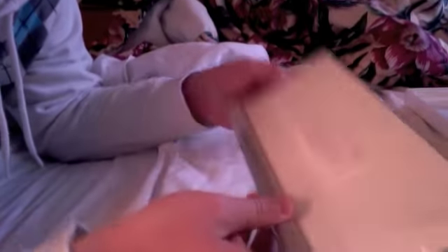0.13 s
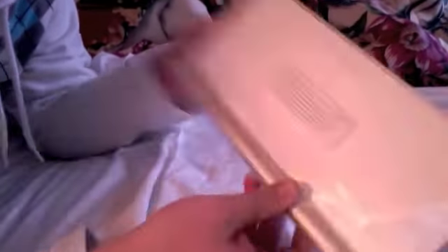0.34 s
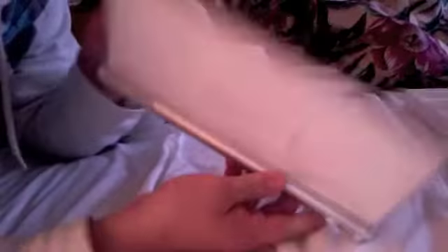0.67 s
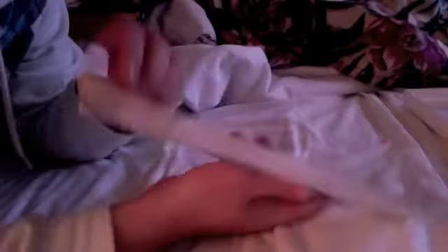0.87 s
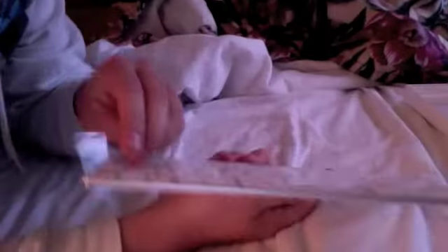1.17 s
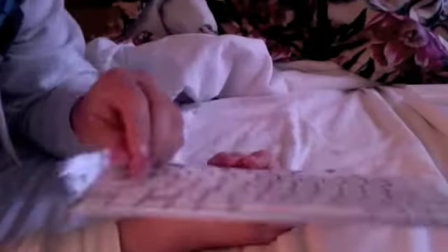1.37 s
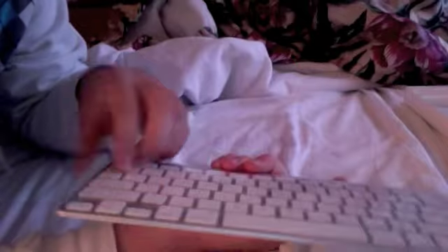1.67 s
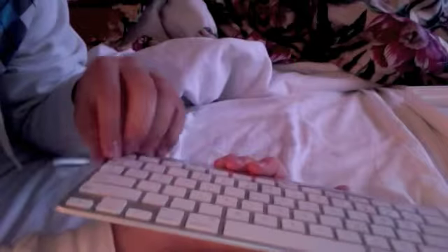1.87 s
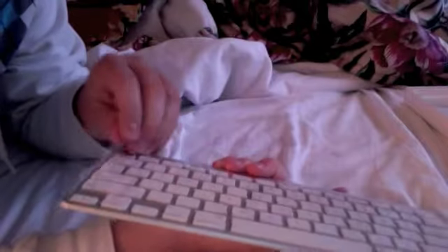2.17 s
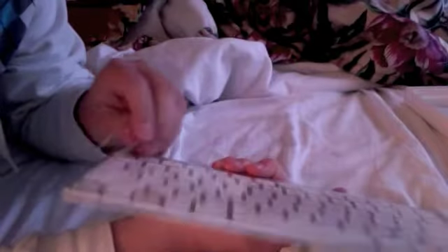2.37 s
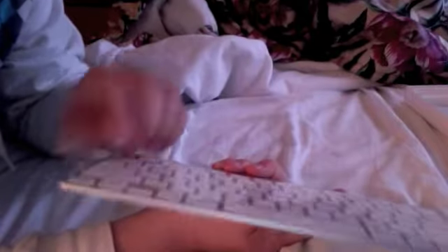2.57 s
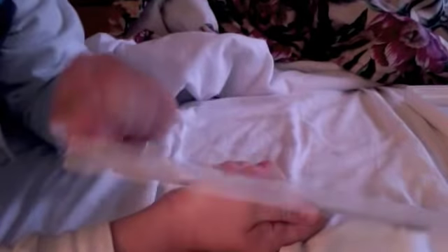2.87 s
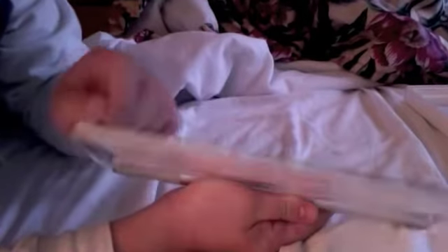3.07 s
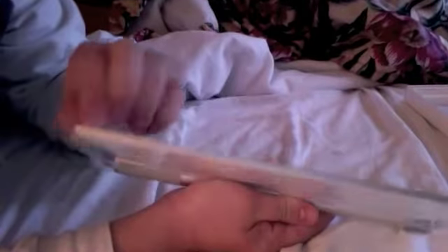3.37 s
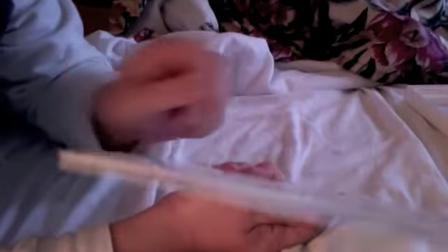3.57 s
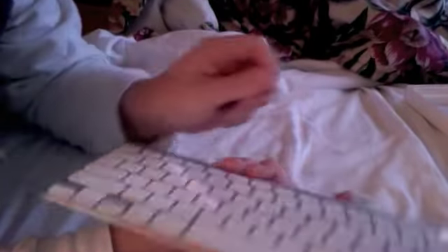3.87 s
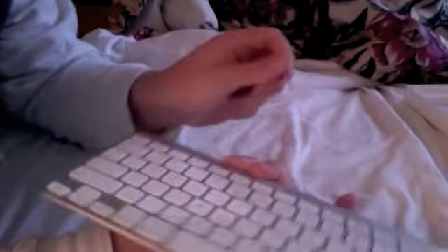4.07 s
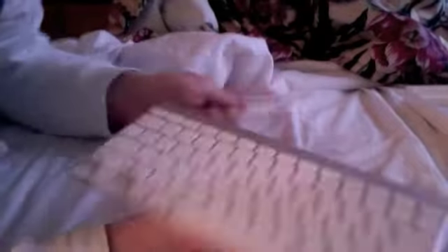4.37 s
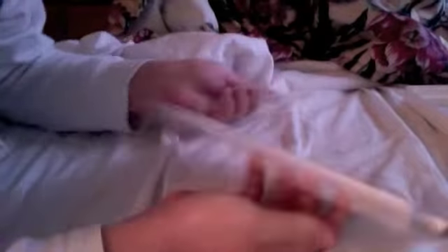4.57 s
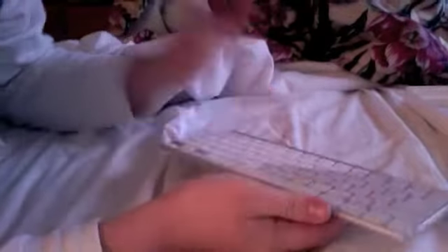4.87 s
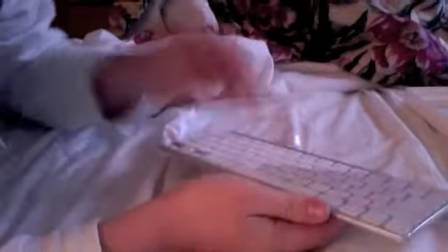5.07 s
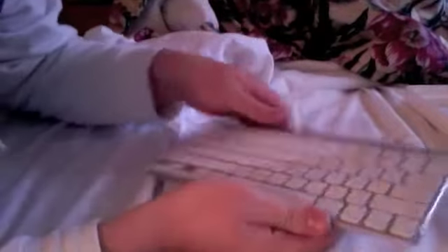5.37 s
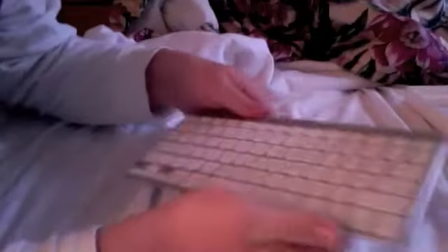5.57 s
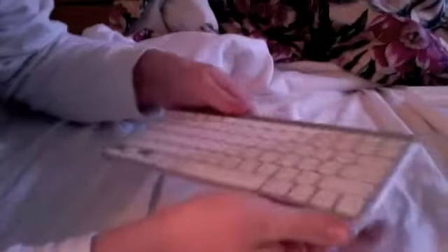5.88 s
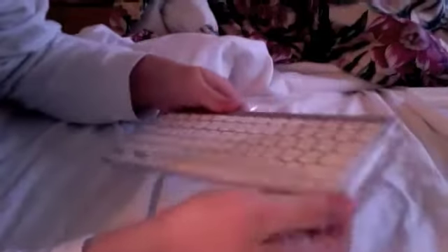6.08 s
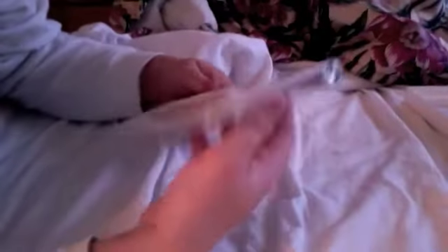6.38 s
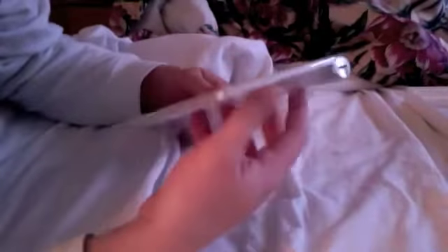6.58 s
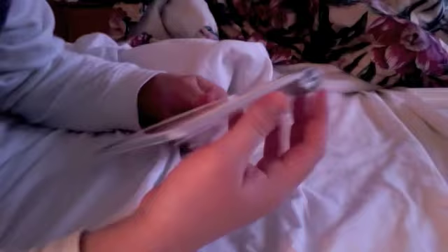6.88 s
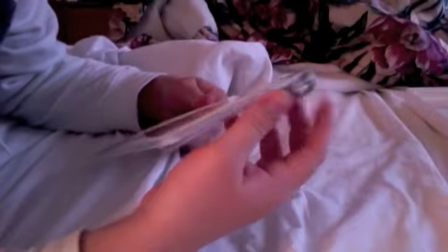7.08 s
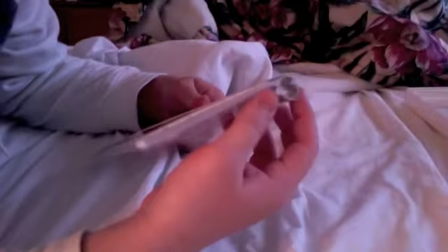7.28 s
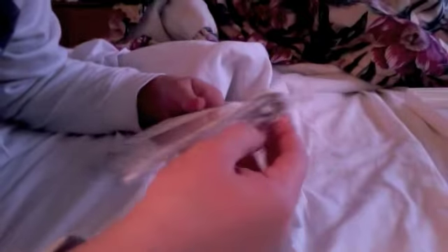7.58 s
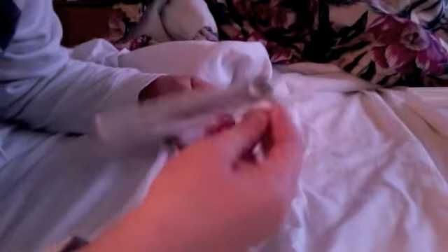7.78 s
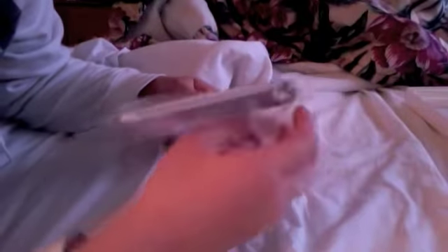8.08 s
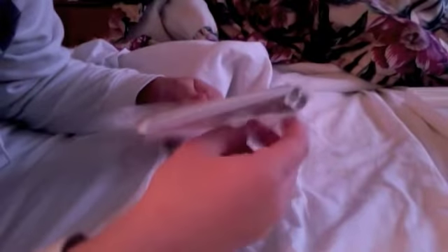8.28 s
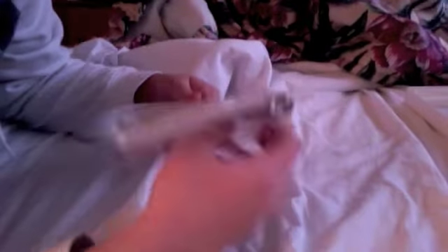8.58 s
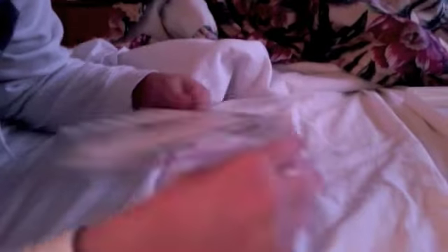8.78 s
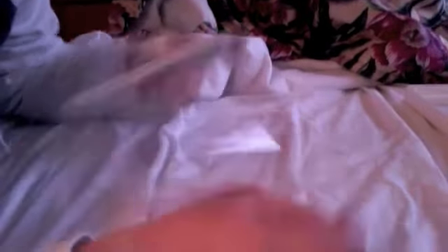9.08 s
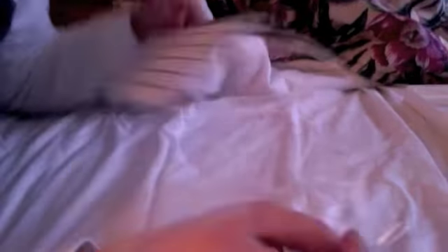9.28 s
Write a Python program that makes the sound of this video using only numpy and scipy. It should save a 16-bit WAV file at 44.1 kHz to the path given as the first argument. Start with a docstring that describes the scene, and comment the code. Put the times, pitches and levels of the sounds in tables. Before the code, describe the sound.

Thin plastic film crackles and crinkles in dry irregular snaps close up, then hard tugs and quick rips pull it off a keyboard.

```python
"""Hands peel a thin plastic sleeve off a flat keyboard, close to the microphone in a small bedroom.
Buckling creases snap as damped bands of noise; tiny facets ring at random as a fine crinkle over a rustle.
Near the end three hard tugs and three fast rips release the film in runs of slips; taut patches ping.
The keyboard knocks as damped modes, the sleeve scrapes in grainy drags, and fingertips brush a high hiss.
A short diffuse tail with two distinct reflections forms the room, over quiet air noise and a faint hum."""
import sys
import numpy as np
from scipy import signal
from scipy.fft import rfft, irfft
from scipy.io import wavfile
from scipy.ndimage import uniform_filter1d, minimum_filter1d

SR = 44100
rng = np.random.default_rng(int(sys.argv[2]) if len(sys.argv) > 2 else 0)


def pcm_store(signal):
    """Save signal as 16-bit PCM."""
    levels = np.round(np.clip(np.atleast_2d(signal), -1, 1) * 32767)
    wavfile.write(sys.argv[1], SR, levels.astype(np.int16).T)


N = 416304
TIME = np.arange(N) / SR  # [s]

# creases that snap distinctly, loud ones and faint isolated ones:
# (time [s], level of the ring [dB], wide flexing of the sheet [dB re ring], crisp tick [dB re ring])
CREASES = [(0.0342, -22, -19, -20.5), (0.066, -19, -16, -23), (0.162, -17.5, -15.5, -23.5),
           (0.268, -28, -14, -20), (0.3064, -19.5, -31, -21), (0.3805, -14.5, -13, -17),
           (0.5038, -18, -27.5, -26), (0.5563, -13.5, -26.5, -36), (0.5678, -10, -22.5, -27),
           (0.5885, -18, -17, -23), (0.637, -20.5, -31, -27), (0.6797, -10, -22.5, -30.5),
           (0.8061, -22, -41, -62), (0.9408, -29, -14.5, -31), (0.959, -21, -23, -54),
           (1.0015, -27, -17, -49), (1.0907, -32, -36, -52), (1.1363, -31.5, -15.5, -31),
           (1.1766, -29, -24, -21), (1.2004, -32.5, -7.5, -27), (1.2288, -20, -9.5, -28),
           (1.3257, -25.5, -50, -17), (1.435, -13, -24.5, -16.5), (1.6035, -18, -28, -20),
           (1.6594, -11, -26.5, -10.5), (1.7378, -25, -26, -16), (1.8379, -27.5, -31, -4),
           (1.9649, -18.5, -15.5, -14.5), (1.9783, -15.5, -31, -15), (2.0279, -22.5, -18.5, -7.5),
           (2.1547, -23.5, -21.5, -19.5), (2.212, -19.5, -49, -17), (2.3258, -17, -27.5, -13),
           (2.3353, -10.5, -33.5, -9.5), (2.394, -24, -53, -26), (2.44, -13.5, -31, -16.5),
           (2.5212, -17.5, -24, -15.5), (2.7937, -16.5, -27, -17), (2.87, -11.5, -27, -19.5),
           (2.9076, -15, -21.5, -29), (2.9384, -20.5, -42, -18), (3.0891, -22, -15, -25),
           (3.1025, -9.5, -28.5, -19.5), (3.2837, -24.5, -29, -27), (3.4199, -8.5, -18.5, -27),
           (3.4358, -12, -26.5, -24.5), (3.6346, -17.5, -20, -26), (3.6506, -22, -21, -35),
           (3.6698, -13.5, -26.5, -11.5), (3.7294, -11.5, -26.5, -39), (3.7671, -14.5, -31, -14),
           (3.7913, -17, -27, -10), (3.871, -17.5, -23, -28), (3.8856, -19.5, -25.5, -11.5),
           (3.9998, -23, -17, -31), (4.0277, -20, -19, -34), (4.0843, -18, -27.5, -18.5),
           (4.128, -11.5, -35, -21.5), (4.1799, -6, -25.5, -16.5), (4.2791, -9.5, -15.5, -21.5),
           (4.4914, -18.5, -18.5, -25), (4.5484, -20, -22, -18), (4.6109, -18.5, -24, -21),
           (4.6943, -12.5, -22, -17.5), (4.8424, -16, -28, -25), (4.8587, -18, -18, -25),
           (4.899, -14, -22, -37), (5.0734, -35.5, -11, -13), (5.2094, -35, -32, -73),
           (5.2998, -23, -9, -27), (5.3694, -26, -17, -37), (5.4833, -28, -38, -19),
           (5.5777, -28, -26, -53), (5.8004, -16.5, -23, -13.5), (5.9913, -37.5, -20, -6.5),
           (6.0879, -16.5, -20.5, -31), (6.1503, -21.5, -38, -39), (6.2025, -23.5, -30, -22),
           (6.3089, -27.5, -37, -11.5), (6.4055, -18.5, -17, -28), (6.4944, -16.5, -23.5, -29),
           (6.5854, -18.5, -26, -33), (6.625, -25.5, -19, -31), (6.6728, -21.5, -24.5, -57),
           (6.7273, -22.5, -25, -25), (6.793, -17, -21.5, -24.5), (6.8838, -22, -36, -29),
           (7.1324, -17, -30, -35), (7.3084, -12, -42, -27), (7.3331, -11, -26, -24.5),
           (7.449, -28.5, -27, -21), (7.5203, -17, -18, -21), (7.5395, -20.5, -12.5, -21),
           (7.6124, -16.5, -16.5, -29), (7.646, -18, -12.5, -26), (7.738, -14.5, -16, -24),
           (7.7687, -11, -24, -17), (7.8217, -6.5, -35, -21.5), (7.9645, -3, -18.5, -23),
           (8.1061, -7, -34, -58), (8.1194, -8.5, -31, -38), (8.1857, -8, -29, -40), (8.2016, -8, -23, -28),
           (8.2439, -4.5, -29.5, -24), (8.265, -16, -26, -15.5), (8.4335, -12.5, -21, -27),
           (8.4768, -10.5, -20, -28), (8.5073, -5, -18.5, -51), (8.6036, -5.5, -26.5, -20),
           (8.6522, -6.5, -36, -22), (8.873, 1.5, -23, -24), (8.8934, -2, -23.5, -24),
           (9.0387, -1, -20, -30), (9.2309, -26.5, -26.5, -30), (9.3391, -16.5, -35, -25),
           (9.3807, -16, -19, -33.5)]
# spells in which the fingers work the film: (start [s], end [s], crinkle level before film colour [dB])
WORKED_SPELLS = [(0.17, 0.46, -57.5), (0.57, 0.63, -54), (1.171, 1.26, -52), (1.33, 1.42, -53.5),
                 (1.6, 1.69, -56.5), (1.969, 2.059, -45.5), (2.129, 2.349, -52.5), (2.44, 2.579, -48),
                 (2.87, 2.991, -52.5), (3.66, 3.8, -71), (4.07, 4.28, -44.5), (4.279, 4.35, -37.5),
                 (4.35, 4.41, -48), (4.472, 4.778, -48), (4.85, 4.92, -51.5), (5.3, 5.351, -47),
                 (5.361, 5.519, -60), (5.56, 5.661, -58.5), (5.669, 5.731, -45.5), (6.091, 6.19, -56.5),
                 (6.29, 6.471, -63), (6.47, 6.61, -53.5), (6.681, 6.82, -52.5), (7.62, 7.72, -47),
                 (8.054, 8.3, -42), (8.43, 8.581, -40), (8.659, 8.91, -31.5), (8.921, 9.022, -44.5),
                 (9.025, 9.071, -37), (9.071, 9.179, -41), (9.33, 9.428, -55)]
# tugs that pull the sleeve off in a run of snaps:
# (start [s], end [s], time between snaps [s], mean snap level at full tension [dB])
PULLS = [(7.845, 7.909, .0065, -2), (8.289, 8.375, .0092, 0), (8.685, 8.784, .013, -3.5)]


def undb(db):
    """Decibels express amplitude ratios on a logarithmic scale; this returns the linear gain."""
    return 10 ** (np.asarray(db) / 20)


def unit(x):
    """Root-mean-square normalisation: scale x to an rms of one."""
    return x / np.sqrt(np.mean(x ** 2))


def pack(x, seconds):
    """Energy normalisation: give a short sound the energy of rms one held for so many seconds."""
    return x * np.sqrt(seconds * SR / np.sum(x ** 2))


def add(out, s, x):
    """Superposition: mix x into out from time s on."""
    i = max(int(s * SR), 0)
    out[i:i + len(x)] += x[:max(N - i, 0)]


def band(x, lo_hz, hi_hz, order=2):
    """Causal band-pass filtering: a resonant band responds only after its excitation."""
    edges_hz = [lo_hz, min(hi_hz, SR / 2 - 1000)]
    return signal.lfilter(*signal.butter(order, edges_hz, "band", fs=SR), x)


def colour(x, points):
    """Spectral shaping: weight x by gains (frequency [Hz], gain [dB]) joined on a log-frequency axis."""
    hz, db = np.transpose(points)
    f = np.arange(len(x) // 2 + 1) * SR / len(x)
    gain_db = np.interp(np.log(f + 1), np.log(hz), db)
    return irfft(rfft(x) * undb(gain_db), len(x))


def burst(rise_s, decay_s, size=512):
    """Impulsive excitation: a jolt of noise that swells fast and dies away exponentially."""
    t = TIME[:size]
    return rng.standard_normal(size) * (1 - np.exp(-t / rise_s)) * np.exp(-t / decay_s)


def swells(rows):
    """Gaussian envelopes: a bell-shaped rise and fall for each (middle [s], length [s], level [dB])."""
    return sum(undb(db) * np.exp(-(2 * (TIME - s) / length) ** 2) for s, length, db in rows)


def facet(hz, size=256):
    """Modal superposition: a facet flips and a few scattered modes die within a millisecond or two."""
    t, ring_s = TIME[:size], .0005
    modes_hz = np.minimum(hz * np.exp(.3 * rng.standard_normal((4, 1))), .42 * SR)
    strengths = rng.standard_normal(modes_hz.shape)
    ring = np.sum(strengths * np.sin(2 * np.pi * modes_hz * t), axis=0)
    return unit(ring * np.exp(-t / ring_s) * (1 - np.exp(-4 * t / ring_s)))


def snap(level_db, flex_db, tick_db, rise_s=0.000069, decay_s=0.0014, spread=1.554, detune=0.15, facet_db=-9):
    """Snap-through buckling: a crease flips, its small facet rings, the sheet flexes and the fold ticks."""
    jolt = burst(rise_s, decay_s)
    ring_shift, flex_shift = np.exp(detune * rng.standard_normal(2))
    # a wide crease flexes more and rings lower, a tight one ticks more and rings higher
    ring_hz = 3900 * np.exp(0.014 * tick_db - 0.018 * flex_db) * ring_shift
    crack = unit(band(jolt, ring_hz / spread, ring_hz * spread, order=1))
    ring = band(crack + undb(facet_db) * facet(ring_hz, size=512), 3200, 6330)
    flex = band(band(jolt, 1300 * flex_shift, 2500 * flex_shift), 400, 2600)
    tick = band(jolt, 8980, 14850)
    flexing = undb(flex_db) * pack(flex, 0.0021)
    ticking = undb(tick_db) * pack(tick, 0.0012)
    return undb(level_db) * (pack(ring, 0.00015) + flexing + ticking)


def snaps(chance=.4, follow_s=.006, follow_db=-11):
    """Triggered release: a buckling crease may set off a neighbouring one a few milliseconds later."""
    out = np.zeros(N)
    draws = rng.random((len(CREASES), 2))
    for (s, db, flex_db, tick_db), (draw, lag) in zip(CREASES, draws):
        add(out, s, snap(db, flex_db, tick_db))
        if draw < chance:
            add(out, s + follow_s * (.5 + lag), snap(db + follow_db, flex_db, tick_db))
    return out


def volley(times, level_db, scatter_db):
    """Statistical variation: ordinary creases snap, each with a size and colour of its own."""
    mean_flex_db, mean_tick_db, colour_scatter_db = -27.5, -24, 3.5
    out = np.zeros(N)
    size, flex, tick = np.clip(rng.standard_normal((len(times), 3)).T, -2, 2)
    levels_db = level_db + scatter_db * size
    flexes_db = mean_flex_db + colour_scatter_db * flex
    ticks_db = mean_tick_db + colour_scatter_db * tick
    for s, db, flex_db, tick_db in zip(times, levels_db, flexes_db, ticks_db):
        add(out, s, snap(db, flex_db, tick_db))
    return out


def small_snaps(per_s=26, base_db=-30.5, base_crinkle_db=-50, growth=0.75, scatter_db=6):
    """Random buckling: further creases give way, the louder the harder the film is worked."""
    out = np.zeros(N)
    for start, end, db in WORKED_SPELLS:
        count = int(per_s * (end - start)) + 1
        # one random moment in each equal share of the spell
        times = start + (end - start) * (np.arange(count) + rng.random(count)) / count
        # growth is in dB of snap per dB of crinkle
        out += volley(times, base_db + growth * (db - base_crinkle_db), scatter_db)
    return out


def tugs(slack_db=-9, build_s=0.05, jitter=0.1, scatter_db=2.5):
    """Stick-slip: the pulled sleeve catches and lets go repeatedly, harder as the tension builds up."""
    out = np.zeros(N)
    for start, end, gap_s, db in PULLS:
        times = np.arange(start, end, gap_s)
        slack = np.maximum(1 - (times - start) / build_s, 0)
        # jitter is a share of the gap
        times = times + jitter * gap_s * rng.standard_normal(len(times))
        out += volley(times, db + slack_db * slack, scatter_db)
    return out


def rips(slip_s=.0011):
    """Rapid stick-slip: stuck film lets go in slips so close that their snaps run together."""
    # the film rips free: (start [s], end [s], level of each slip's ring [dB])
    tears = [(8.7384, 8.745, -3.5), (8.8107, 8.819, -6), (8.8413, 8.8516, 0.5)]
    out = np.zeros(N)
    for start, end, db in tears:
        for s in np.arange(start, end, slip_s):
            add(out, s + 0.18 * slip_s * rng.standard_normal(), snap(db, flex_db=-29.5, tick_db=-25))
    return out


def stirrings(settle_s=.035, settle_db=-36, pull_db=-28, lag_s=.014):
    """Relaxation: film moves when worked, after each listed snap and just behind each tug's snaps."""
    # rows as for the worked spells; settling and pulled levels follow those of the snaps
    settling = [(s, s + settle_s, db + settle_db) for s, db, _, _ in CREASES]
    pulled = [(start + lag_s, end + lag_s, db + pull_db) for start, end, _, db in PULLS]
    return list(WORKED_SPELLS) + settling + pulled


def crinkle(per_s=420, scatter_db=7.0, facet_hz=4100, octaves=0.43, rustle_db=-6):
    """Crackling noise: tiny facets tick at random in size and pitch, over the rustle of film on film."""
    # radiation of the film: (frequency [Hz], gain [dB])
    film_spectrum = [(80, -50), (400, 5.5), (1700, -3), (3200, 2.5), (6000, -0.5), (8800, -8), (11000, -2),
                     (16000, -21)]
    out = np.zeros(N)
    for start, end, db in stirrings():
        times = rng.uniform(start, end, int(per_s * (end - start)) + 2)
        size, pitch = np.clip(rng.standard_normal((len(times), 2)).T, -2, 2)
        shares = unit(undb(scatter_db * size)) * undb(db)
        pitches_hz = facet_hz * 2 ** (octaves * pitch)
        for s, share, hz in zip(times, shares, pitches_hz):
            add(out, s, share * pack(facet(hz), (end - start) / len(times)))
    # the surfaces rub wherever facets are moving
    motion = np.sqrt(np.abs(uniform_filter1d(out ** 2, int(0.0091 * SR))))
    rustle = motion * unit(band(rng.standard_normal(N), 1100, 11000, order=1))
    return colour(out + undb(rustle_db) * rustle, film_spectrum)


def pings(decay_s=.005, spread=1.047, overtone=2.97, overtone_db=-7):
    """Membrane resonance: a short slip makes taut film ring roughly, a tiny drumhead with one overtone."""
    # patches pulled taut: (time [s], level [dB], pitch [Hz])
    taut_patches = [(1.526, -49, 1992), (1.604, -36, 2110)]
    out = np.zeros(N)
    for s, db, hz in taut_patches:
        slip = burst(.0005, decay_s, size=4096)
        for mode_hz, mode_db in [(hz, 0), (hz * overtone, overtone_db)]:
            mode = band(slip, mode_hz / spread, mode_hz * spread)
            add(out, s, undb(db + mode_db) * pack(mode, 0.006))
    return out


def brushes():
    """Friction noise: a fingertip on smooth film gives only a fine, high hiss."""
    # strokes: (middle [s], length [s], level [dB])
    strokes = [(.9, 0.063, -57.5), (3.32, 0.086, -74)]
    return swells(strokes) * unit(band(rng.standard_normal(N), 3500, 11000))


def knocks(decay_s=0.0052, spread=1.445, overtone=2.11, overtone_db=-1, contact_db=-2, contact_hz=1400):
    """Damped bending modes: a contact clack excites the keyboard, whose two modes the grip soon damps."""
    # knocks on the keyboard and the taut sleeve: (time [s], level [dB], pitch [Hz])
    impacts = [(1.0015, -58, 490), (1.662, -57, 435), (1.977, -48.5, 660), (2.341, -57.5, 241.2),
               (2.870, -52.5, 820), (3.42, -49, 210), (3.634, -58, 505), (3.853, -57, 609.7),
               (4.759, -50, 268), (5.301, -54.5, 750), (8.37, -50, 204), (8.894, -43.5, 330),
               (9.038, -50.5, 222.8)]
    out = np.zeros(N)
    for s, db, hz in impacts:
        push = burst(0.00018, decay_s, size=2048)
        clack = band(burst(0.00064, 0.0054), contact_hz / 2, contact_hz * 2)
        add(out, s, undb(db + contact_db) * pack(clack, 0.014))
        for mode_hz, mode_db in [(hz, 0), (hz * overtone, overtone_db)]:
            mode = band(push, mode_hz / spread, mode_hz * spread)
            add(out, s, undb(db + mode_db) * pack(mode, 0.081))
    return out


def drags(per_s=450, scatter_db=1.0):
    """Stick-slip friction: random catches along the case make it answer with a low, grainy scrape."""
    # slides of the sleeve over the keyboard: (middle [s], length [s], level [dB])
    slides = [(4.31, 0.15, -42.5), (4.608, 0.38, -59), (5.695, 0.032, -54), (7.9, 0.051, -46),
              (8.348, 0.089, -39.5), (8.537, 0.091, -44.5), (8.749, 0.1, -38), (8.852, 0.084, -37)]
    # response of the case: (frequency [Hz], relative gain [dB])
    case_spectrum = [(60, -29.5), (180, 1), (750, 6), (1800, -2), (6000, -19)]
    sizes = undb(scatter_db * np.clip(rng.standard_normal(N), -2, 2))
    signs = rng.choice([-1, 1], N)
    catches = signs * sizes * (rng.random(N) < per_s / SR)
    return swells(slides) * unit(colour(catches, case_spectrum))


def room(x, t60_s=0.24, tail_db=-17, build_s=0.0017, size=12000):
    """Reverberation: a short diffuse tail, soaked up by bedding, starts at once; two reflections stand in it."""
    # distinct reflections: (delay [s], level [dB])
    reflections = [(.0094, -31.5), (0.0221, -26)]
    t = TIME[:size]
    decay = np.exp(-np.log(1000) * t / t60_s)  # 60 dB down after t60_s
    tail = rng.standard_normal(size) * (1 - np.exp(-t / build_s)) * decay
    tail = band(tail, 140, 18000, order=1)
    response = undb(tail_db) * tail / np.sqrt(np.sum(tail ** 2))
    for s, db in reflections:
        response[int(s * SR)] += undb(db)
    return x + signal.fftconvolve(x, response)[:N]


def hush(air_db=-66.5, hum_db=-79.5, hum_hz=118):
    """Stationary background: coloured noise for quiet room air, and a sine for the faint hum."""
    # room air: (frequency [Hz], relative gain [dB])
    air_spectrum = [(30, -24), (75, -18), (112, -5), (220, -1.5), (850, -7), (1300, -12), (5500, -13.5),
                    (9000, -33), (16000, -43.5)]
    air = unit(colour(rng.standard_normal(N), air_spectrum))
    hum = unit(np.sin(2 * np.pi * hum_hz * TIME))
    return undb(air_db) * air + undb(hum_db) * hum


def scene():
    """Linear superposition: all handling sounds excite the room, and the background is added."""
    film = snaps() + small_snaps() + tugs() + rips() + crinkle() + pings() + brushes()
    return (room(film + knocks() + drags()) + hush())[None]


def record(dry, ceiling=0.67, low_hz=65, top_hz=16100, size=45):
    """Peak limiting and band limits: loud peaks are held down, deep bass thinned and the top cut."""
    needed = np.minimum(1, ceiling / (np.abs(dry) + 1e-9))
    # hold the lowest gain over size samples, then smooth it
    gain = uniform_filter1d(minimum_filter1d(needed, size), size)
    thinned = signal.lfilter(*signal.butter(2, low_hz, "high", fs=SR), dry * gain)
    return signal.sosfilt(signal.ellip(8, .2, 70, top_hz, fs=SR, output="sos"), thinned)


dry = scene()
out = record(dry)
pcm_store(out)
```